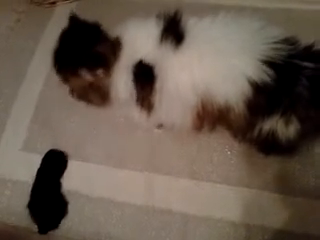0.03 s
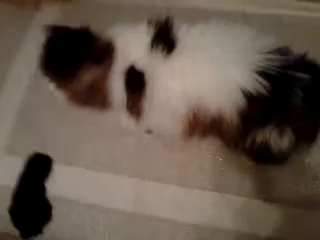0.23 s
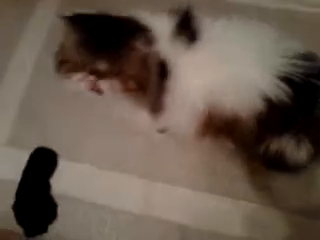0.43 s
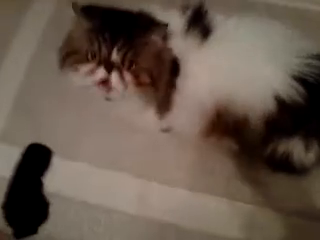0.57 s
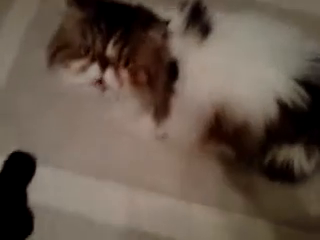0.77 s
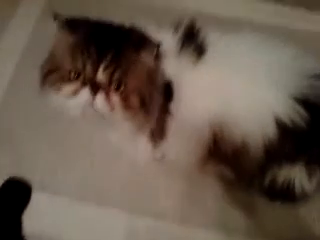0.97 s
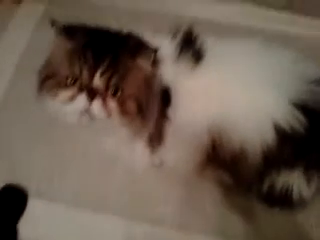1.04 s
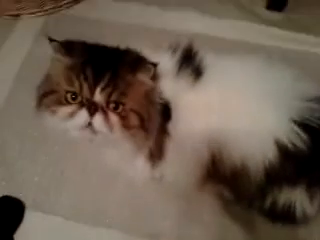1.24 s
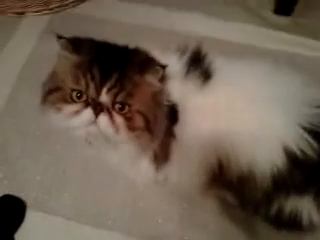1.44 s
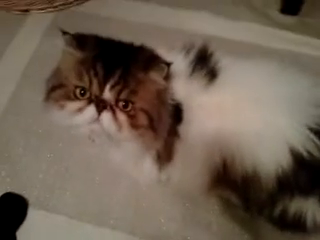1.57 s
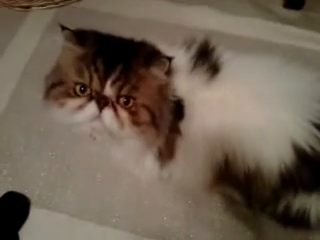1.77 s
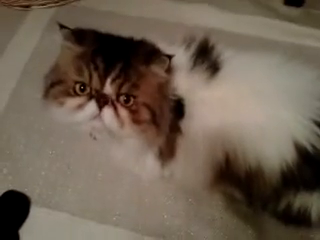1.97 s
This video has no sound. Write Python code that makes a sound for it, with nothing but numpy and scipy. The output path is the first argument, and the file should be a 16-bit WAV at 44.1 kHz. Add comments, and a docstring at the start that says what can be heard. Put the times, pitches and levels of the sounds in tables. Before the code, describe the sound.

Soft licking from a cat grooming itself near the microphone in a quiet room. Short, uneven tongue strokes mix with brushed fur and gentle bumps for about a second, followed by a faint rustle and light taps.

```python
"""A long-haired cat licks its coat on a rug, over the hush of a small room.
It shifts, and its fur hisses between the first licks. They come about seven a second,
each a short rasp of tongue on fur; the heavier ones carry a soft, dull bump.
After about a second the cat lifts its head, which settles with a faint rustle.
One last light lick and a few faint taps follow."""
import sys
import numpy as np
from scipy import signal
from scipy.fft import rfft, irfft, next_fast_len
from scipy.io import wavfile
from scipy.ndimage import map_coordinates

SR = 44100
rng = np.random.default_rng(int(sys.argv[2]) if len(sys.argv) > 2 else 0)


def dump_mix(stems):
    """Bounce the given channels to the path in sys.argv[1] as a 16-bit WAV at rate SR."""
    frames = np.atleast_2d(stems).T  # one column per channel
    limited = np.clip(frames, -1, 1)  # hard clip at full scale
    pcm = np.round(limited * 32767).astype(np.int16)
    wavfile.write(sys.argv[1], SR, pcm)


N = 88200
T = np.arange(N) / SR

# Tone of the room's hush, from low to high: f/Hz, level/dB
HUSH_TONE = [(15, -44.5), (25, -1), (43, -2.5), (243, -8), (347, -18), (461, -8), (584, -8.5), (938, -9.5),
             (1700, -14), (4170, -14.5), (7200, -17), (9360, -66.5), (15800, -120)]
# How long the room echoes: f/Hz, time to fade by 60 dB/s
ROOM_FADE = [(100, 0.19), (500, 0.32), (2000, 0.053), (7000, 0.24)]
# The cat shifting on the rug: t/s, level/dB
SHIFT_LEVELS = [(0, -74.5), (.15, -68), (.28, -60.5), (.34, -54), (.43, -58), (.58, -56.5), (.70, -55.5),
                (.78, -61.5), (.85, -52.5), (.92, -58.5), (1.02, -58.5), (1.15, -68), (1.32, -62.5),
                (1.44, -64), (1.55, -68), (2, -68)]
# Its low, rubbing tone: f/Hz, level/dB
SHIFT_TONE = [(25, 11), (70, 1.5), (160, 1), (290, -2), (480, -6.5), (800, -15), (1700, -18), (3000, -34),
              (7000, -55)]
# The hiss of brushed fur: t/s, level/dB
FUR_LEVELS = [(0, -93), (.165, -77), (.205, -68), (.29, -62.5), (.37, -60.5), (.45, -66.5), (.53, -62),
              (.62, -67), (.70, -95.5), (1.0, -85.5)]
# Its bright tone: f/Hz, level/dB
FUR_TONE = [(100, -16.5), (700, -3.5), (2800, 4.5), (4000, 3.5), (6200, 4), (7400, 0)]
# The rustle as the head settles: t/s, level/dB
SETTLE_LEVELS = [(.9, -88), (1.0, -74), (1.09, -70), (1.14, -84), (1.25, -72.5), (1.32, -70.5),
                 (1.38, -81.5), (1.6, -95)]
# Its thin tone: f/Hz, level/dB
SETTLE_TONE = [(300, -21), (1000, -11.5), (1500, 1.5), (2600, -12.5), (4500, -24.5)]
# Soft bumps and taps: t/s, level/dB, width/s, ring compared with the bump/dB
BUMP_EVENTS = [(0.408, -54.5, 0.0014, -19), (0.455, -45, 0.00098, -27.5), (0.518, -40, .0025, -9.5),
               (0.669, -31.5, 0.0018, -25.5), (0.6816, -31.5, 0.0028, -37.5), (0.682, -27.5, 0.0005, -22),
               (0.8219, -37.5, 0.0017, -25.5), (0.96, -41, 0.0024, -22.5), (0.9936, -40, 0.00062, -6.5),
               (1.101, -47, 0.0013, -20), (1.217, -58.5, 0.0013, -24), (1.559, -53, 0.0013, -25),
               (1.605, -47.5, 0.00067, -16.5), (1.813, -49, 0.00091, -37)]
# The notes that ring after a bump: f/Hz, level/dB, time to fade by 60 dB/s
RING_NOTES = [(272, 2, 0.16), (403, -10.5, 0.021)]
# Licks at their peaks: t/s, level/dB, rise/s, fall/s, brightness/(dB per octave), f/Hz, boost at f/dB
LICKS = [(0.194, -61, 0.016, 0.0055, 1.5, 2470, 18), (0.205, -46, 0.0057, 0.0032, .3, 192, -3),
         (0.218, -44, 0.011, 0.02, 1.5, 2770, 4.5), (0.354, -53, 0.035, .02, 0.7, 292, 10),
         (.377, -47.5, 0.021, .018, 1, 2180, 5.5), (0.454, -54, 0.013, 0.013, -2.5, 850, 7),
         (0.518, -40.5, 0.0089, 0.014, -1.5, 983, 8.5), (.632, -51, .013, 0.026, -3.4, 1330, 13.5),
         (.670, -39, 0.0081, 0.0088, -1.14, 1046, 4.5), (.680, -38, 0.009, 0.0031, 0.7, 1020, 10),
         (.820, -44, 0.011, 0.007, -1.27, 1500, 4.5), (.965, -38.5, 0.016, 0.014, -2.1, 1540, 7),
         (0.995, -48.5, 0.0063, 0.011, -4, 1720, 18.5), (1.315, -61.5, 0.011, 0.013, 1, 1390, 20.5)]
# Tone of the tongue rasping on fur: f/Hz, level/dB
RASP_TONE = [(30, -12.5), (100, 1), (280, -1), (480, -6.5), (740, -6), (1000, -8.5), (1300, -11),
             (1700, -12.5), (2800, -16.5), (4100, -25), (6300, -29), (7400, -36.5)]


def amp(db):
    """Turn decibels into a number to multiply by."""
    return 10 ** (np.asarray(db) / 20)


def unit(x):
    """Scale a sound to an average strength (rms) of 1."""
    return x / np.sqrt(np.mean(x ** 2) + 1e-20)


def along(points, hz):
    """Read between a table's rows, with frequency spaced in octaves."""
    freqs, values = np.transpose(points)
    return np.interp(np.log(hz + 1), np.log(freqs + 1), values)


def filtered(x, gain):
    """Turn each frequency up or down by gain(hz)."""
    size = next_fast_len(N + SR // 2)
    hz = np.fft.rfftfreq(size, 1 / SR)
    return irfft(rfft(x, size) * gain(hz), size)[:N]


def friction(tone, tilt=0, boost_hz=1000, boost_db=0, slips_per_s=4000):
    """Thousands of hairs slip free, making tiny clicks over a smooth hiss."""
    slips = (rng.random(N) < slips_per_s / SR) * rng.standard_normal(N)
    slips *= amp(1.5 * rng.standard_normal(N))
    hiss = 0.86 * rng.standard_normal(N)

    def gain(hz):
        brightness = tilt * np.log2(np.maximum(hz, 150) / 700)  # tips like a seesaw around 700 Hz
        octaves_away = np.log2((hz + 1) / boost_hz)
        boost = boost_db / (1 + (octaves_away / 0.18) ** 2)  # lifts one narrow band
        return amp(along(tone, hz) + brightness + boost)

    return unit(filtered(unit(slips) + hiss, gain))


def hush(level_db=-70):
    """The room rumbles and the microphone hisses steadily."""
    noise = filtered(rng.standard_normal(N), lambda hz: amp(along(HUSH_TONE, hz)))
    return amp(level_db) * unit(noise)


def room_echo(x, level_db=-23.5):
    """A carpeted room answers with a short, dull echo."""
    hz, t, noise = signal.stft(rng.standard_normal(SR // 2), SR, nperseg=256)
    fade = amp(-60 * t / along(ROOM_FADE, hz)[:, None])
    _, tail = signal.istft(noise * fade, SR, nperseg=256)
    return amp(level_db) * signal.fftconvolve(x, tail / np.linalg.norm(tail))[:N]


def rustle(levels, tone, flutter_db, changes_per_s=45):
    """Fur keeps rubbing, louder and softer as the pressure flutters at random."""
    pressure = map_coordinates(rng.standard_normal(1000), [T * changes_per_s], mode="wrap")
    level_db = np.interp(T, *np.transpose(levels))
    return amp(level_db + flutter_db * np.tanh(pressure)) * friction(tone)


def bumps():
    """Each padded touch pushes once, springs back and rings briefly."""
    out = np.zeros(N)
    for when, db, width, ring_db in BUMP_EVENTS:
        offset = (T - when) / width
        push = offset * np.exp((1 - offset ** 2) / 2)
        age = np.maximum(T - when, 0)
        ring = sum(amp(level - 60 * age / fade_s) * np.sin(2 * np.pi * hz * age)
                   for hz, level, fade_s in RING_NOTES)
        out += amp(db) * (push + amp(ring_db) * ring)
    return out


def licks():
    """The tongue drags over fur and lets go; each lick has its own brightness and resonance."""
    out = np.zeros(N)
    for when, db, rise, fall, tilt, boost_hz, boost_db in LICKS:
        from_peak = np.abs(T - when) / np.where(T < when, rise, fall)
        swell = np.exp(-from_peak ** 1.63)
        out += amp(db) * swell * friction(RASP_TONE, tilt, boost_hz, boost_db)
    return out


def scene():
    """Add everything into one channel; only the licks and bumps echo."""
    cat = licks() + bumps()
    shifting = rustle(SHIFT_LEVELS, SHIFT_TONE, flutter_db=4.0)
    fur = rustle(FUR_LEVELS, FUR_TONE, flutter_db=2.6)
    settling = rustle(SETTLE_LEVELS, SETTLE_TONE, flutter_db=4.4)
    return (cat + room_echo(cat) + shifting + fur + settling + hush())[None]


def record(dry, low_hz=22, top_hz=7280):
    """Soften the deepest bass and sharply cut off the highest treble."""
    def gain(hz):
        bass_cut = hz / np.hypot(hz, low_hz)
        treble_cut = 1 / np.sqrt(1 + (hz / top_hz) ** 160)
        return bass_cut * treble_cut

    return filtered(dry[0], gain)[None]


dry = scene()
out = record(dry)
dump_mix(out)
```